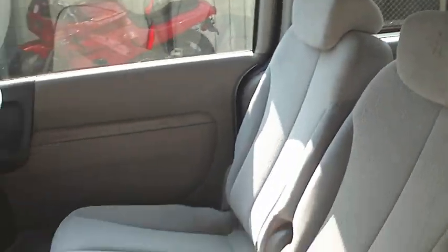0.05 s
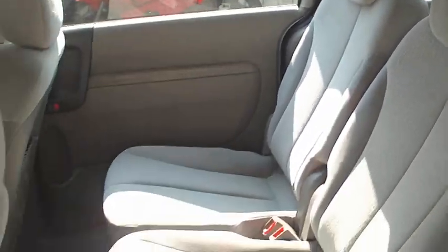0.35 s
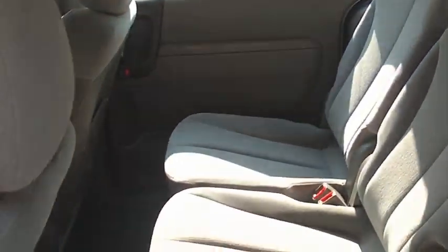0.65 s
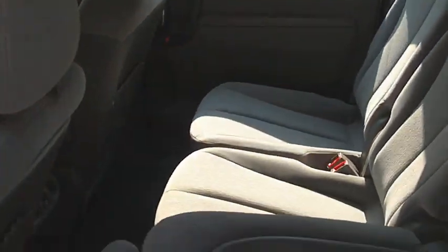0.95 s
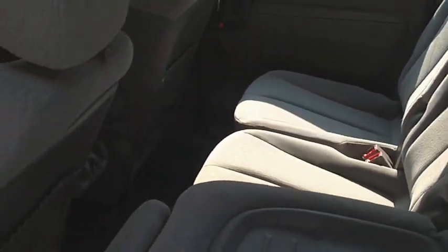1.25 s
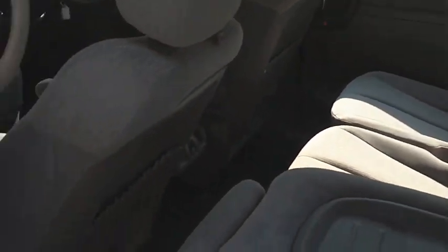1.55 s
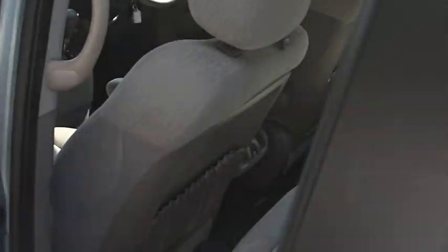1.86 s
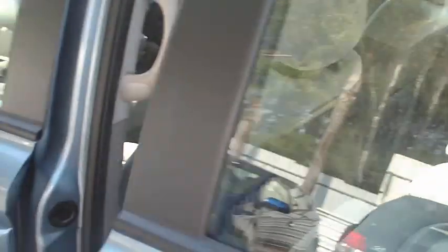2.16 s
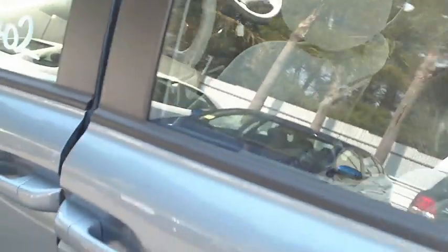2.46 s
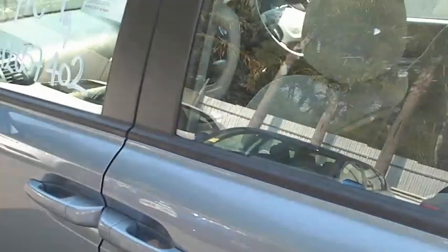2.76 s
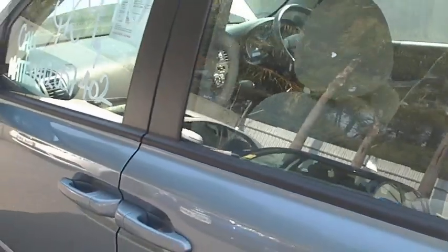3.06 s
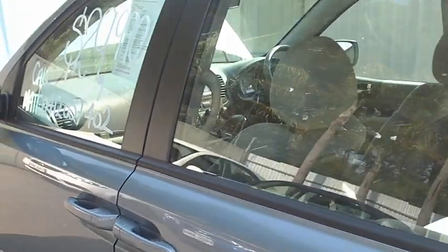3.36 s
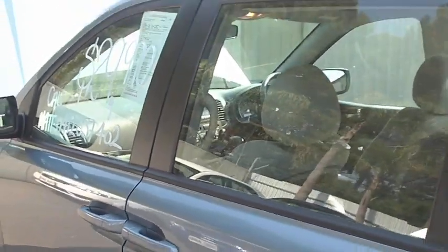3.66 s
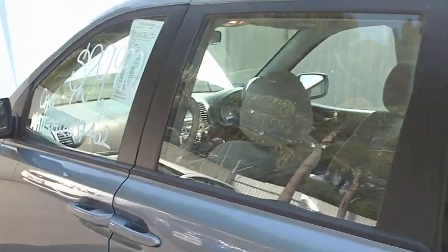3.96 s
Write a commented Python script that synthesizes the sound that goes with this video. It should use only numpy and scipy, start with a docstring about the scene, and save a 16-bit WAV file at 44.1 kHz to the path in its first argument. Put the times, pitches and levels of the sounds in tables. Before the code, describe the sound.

A minivan's sliding door closes nearby, outdoors. After a small click at 0.2 seconds and soft rubbing, its catch clicks free around 1.3 seconds. From 1.5 seconds the door rumbles along its track, knocking at 1.9, then slams shut at about 2.6 seconds with a metallic snap and a low boom. Sleeve-like rustling follows from 3.3 seconds. Steady traffic and low wind continue underneath.

```python
"""A minivan's side door clicks open, rumbles along its track and slams shut, close by and outdoors.
The rollers shake the door panel; the slam rings the latch, sets the body booming and pushes out
a puff of air that overloads the recorder. Soft rubbing, as of sleeve and hand, comes with each move.
Traffic and low wind go on underneath."""
import sys
import numpy as np
from scipy import signal
from scipy.fft import rfft, irfft
from scipy.io import wavfile
from scipy.ndimage import minimum_filter1d

SR = 44100
rng = np.random.default_rng(int(sys.argv[2]) if len(sys.argv) > 2 else 0)


def int16_out(signal):
    """Quantize to a 16-bit WAV file."""
    q = np.round(np.clip(np.atleast_2d(signal).T, -1, 1) * 32767)
    wavfile.write(sys.argv[1], SR, q.astype(np.int16))


N = 176400
T = np.arange(N) / SR

# modes of the door panel: (frequency [Hz], level [dB], t60 [s])
PANEL_MODES = [(55.8, -4.5, .3), (88, -8, .15), (121.5, -2, 0.24), (145, -4, 0.11), (175.7, -3, 0.12),
               (204.4, -1.5, 0.19), (252, -2.5, 0.088), (302.7, -2, 0.09), (345.5, 0, 0.051),
               (488, -4.5, .07), (671, -14.5, 0.059)]
# bright colour of a hardware click: (frequency [Hz], level [dB])
CLICK_SPECTRUM = [(300, -19.5), (1500, 5.5), (2300, -5.5), (2900, 5.5), (3500, -1), (4200, -3), (4900, 1.5),
                  (5800, 2), (6600, -5.5), (7300, -6.5)]


def amp(db):
    """Decibels to gain."""
    return 10 ** (np.asarray(db) / 20)


def unit(x):
    """Scales to rms 1."""
    return x / np.sqrt(np.mean(x ** 2) + 1e-20)


def fader(rows, column=1):
    """Gain over time from one dB column of a curve."""
    rows = np.array(rows)
    return amp(np.interp(T, rows[:, 0], rows[:, column]))


def colour(x, spectrum, ripple_db=0):
    """Gives x a spectrum, with optional ripple on top, at rms 1."""
    hz, db = np.transpose(spectrum)
    f = np.fft.rfftfreq(N, 1 / SR)
    curve_db = np.interp(np.log(f + 1), np.log(hz + 1), db)
    return unit(irfft(rfft(x) * amp(curve_db + ripple_db), N))


def noise(spectrum):
    """Coloured noise at rms 1."""
    return colour(rng.standard_normal(N), spectrum)


def resonate(x, spectrum, width_hz, ripple_db):
    """Colours x like a vibrating object: a smooth spectrum with many small resonances."""
    bins = N // 2 + 1
    lag = np.fft.rfftfreq(bins, SR / N)
    smoothing = np.exp(-(lag * width_hz) ** 2) * (1 - np.exp(-(lag * 10 * width_hz) ** 2))
    ripple = unit(irfft(rfft(rng.standard_normal(bins)) * smoothing, bins))
    return colour(x, spectrum, ripple_db * ripple)


def waver(rate_hz, depth_db):
    """Smooth random gain."""
    f = np.fft.rfftfreq(N, 1 / SR)
    drift = irfft(rfft(rng.standard_normal(N)) * np.exp(-(f / rate_hz) ** 2) * (f > 0), N)
    return amp(depth_db * unit(drift))


def grains(per_s, spread_db):
    """Random tiny impacts of uneven size."""
    size = amp(spread_db * np.minimum(rng.exponential(1, N), 4))
    return unit(size * rng.choice([-1, 1], N) * (rng.random(N) < per_s / SR))


def strike(s, t60, rise_s=.0007):
    """Envelope of a hit at time s: quick rise, exponential decay."""
    t = np.maximum(T - s, 0)
    return (1 - np.exp(-t / rise_s)) * np.exp(-np.minimum(np.log(1000) * t / t60, 40))


def modal_tone(modes, samples):
    """Decaying modes, neighbours swinging in opposite directions."""
    t = np.arange(samples) / SR
    return sum((-1) ** k * amp(db - 60 * t / t60) * np.sin(2 * np.pi * hz * t)
               for k, (hz, db, t60) in enumerate(modes))


def ring(hits, modes):
    """Each hit sets the modes ringing for up to a second."""
    out, tone = np.zeros(N), modal_tone(modes, SR)
    for s, db in hits:
        part = out[round(s * SR):][:len(tone)]
        part += amp(db) * tone[:len(part)]
    return out


def lowpass(x, hz):
    """Steep band limit."""
    return signal.oaconvolve(x, signal.firwin(301, hz, window=("kaiser", 8), fs=SR)[None], "same")


def slam():
    """Metal meets metal, the claw snaps shut, the body booms on and cars and walls echo."""
    # impacts of guide and latch: (time [s], relative crash level [dB], ring level [dB])
    impacts = [(1.9285, -12, -17.5), (2.633, 1.5, 2.5), (2.667, -10, -23), (2.685, -12, -21)]
    # colour of the metal crash: (frequency [Hz], level [dB])
    crash_spectrum = [(150, 12), (700, 0.5), (1800, -3), (2400, -11.5), (3500, -17), (5200, -20),
                      (7200, -25)]
    # ring of the latch: (frequency [Hz], level [dB], t60 [s])
    latch_modes = [(358, -5, .08), (672, -3, 0.14), (918, -4, 0.064), (1017, -1, 0.064), (1285, 1.5, 0.044),
                   (1672, -16, 0.32), (1872, -3, 0.11), (1932, 0.5, 0.097), (2564, -13.5, 0.2),
                   (2710, -15, 0.038)]
    # the claw snaps over its teeth: (time [s], level [dB])
    claw_snaps = [(2.635, -10), (2.64, -10), (2.6508, -7), (2.656, -1), (2.668, -1), (2.684, -9)]
    # boom of the body: (frequency [Hz], level [dB])
    boom_spectrum = [(15, -8.5), (40, -4), (56, 6.5), (85, -4), (118, -1), (150, -15), (230, -12),
                     (330, -19.5), (600, -31.5), (2000, -76)]
    # drone of cabin air and door skin: (frequency [Hz], level [dB], t60 [s])
    cabin_modes = [(55, -4, 1.6), (65.8, -3, 0.46), (114, -16, 0.47)]
    slam_s = 2.65
    crash = noise(crash_spectrum) * sum(amp(db + 3) * strike(s, t60=0.17) for s, db, _ in impacts)
    latch = ring([(s, db) for s, _, db in impacts], latch_modes)
    claw = noise(CLICK_SPECTRUM) * sum(amp(db) * strike(s, t60=0.033) for s, db in claw_snaps)
    boom = noise(boom_spectrum) * amp(-2.5) * strike(slam_s, t60=1.0, rise_s=0.016)
    drone = ring([(slam_s, 0)], cabin_modes)
    echo = noise(crash_spectrum) * amp(-10) * strike(slam_s, t60=0.15, rise_s=0.0064)
    return crash + latch + claw + boom + drone + echo


def rollers():
    """Bumps in the track shake the panel's modes; grit hisses under the wheels."""
    # the door's travel: (time [s], rumble level [dB], hiss level [dB])
    travel = [(1.5, -26, -47.5), (1.62, -19, -40), (1.76, -13, -27), (1.84, -18.5, -29), (1.9, -11, -21),
              (1.98, -13.5, -29.5), (2.07, -12, -22.5), (2.2, -12, -20.5), (2.42, -13.5, -29.5),
              (2.61, -13, -27), (2.67, -4, -52)]
    # hiss of the wheels: (frequency [Hz], level [dB])
    hiss_spectrum = [(150, -9.5), (400, 7.5), (800, 1), (1300, -2), (2300, -6), (2750, -3.5), (3700, -11),
                     (4500, -10), (5500, -18.5), (7200, -51)]
    bumps = grains(per_s=450, spread_db=2.5)
    panel = modal_tone(PANEL_MODES, SR // 2)
    rumble = unit(signal.fftconvolve(bumps, panel)[:N]) * fader(travel, column=1)
    grit = rng.standard_normal(N) + 0.25 * grains(per_s=580, spread_db=7.5)
    hiss = resonate(grit, hiss_spectrum, width_hz=24, ripple_db=2.4)
    hiss *= fader(travel, column=2) * waver(rate_hz=28, depth_db=1)
    return (rumble + hiss) * (T > travel[0][0]) * (T < travel[-1][0])


def judder():
    """The door shudders once, just before the bend in its track."""
    # narrow, low band of the shudder: (frequency [Hz], level [dB])
    spectrum = [(80, -33), (115, -2), (135, -1.5), (165, -7), (210, -22), (500, -68)]
    centre_s, half_length_s = 1.85, 0.079
    return noise(spectrum) * amp(-10.5) * np.exp(-((T - centre_s) / half_length_s) ** 4)


def thuds():
    """Blows knock dully on the panel, and the roller arm thuds into the bend of the track."""
    # blows on the panel: (time [s], level [dB])
    panel_hits = [(1.248, -15.5), (1.357, -11.5), (1.929, -10), (2.6305, -12), (2.686, -6)]
    # blows on the arm: (time [s], level [dB])
    arm_hits = [(1.9315, 1), (2.051, -12)]
    # low ring of the arm: (frequency [Hz], level [dB], t60 [s])
    arm_modes = [(126, -18, 0.13), (181, -0.5, 0.097), (256, -2.5, 0.093), (338, -4, .08)]
    return ring(panel_hits, PANEL_MODES) + ring(arm_hits, arm_modes)


def clicks():
    """Handle, catch and rollers tick in short, bright bursts."""
    # clicks: (time [s], level [dB], t60 [s])
    ticks = [(.178, -13.5, 0.0098), (1.242, -20.5, 0.094), (1.2614, -19, .05), (1.346, -12, 0.053),
             (1.8304, -14.5, 0.055), (1.9055, -13, .06), (1.926, -12.5, .025), (2.2064, -24, 0.035)]
    return noise(CLICK_SPECTRUM) * sum(amp(db) * strike(s, t60) for s, db, t60 in ticks)


def catch():
    """The catch that held the door open is struck and pings."""
    # strikes on the catch: (time [s], level [dB])
    hits = [(1.2635, -23), (1.348, -17)]
    # its high ring: (frequency [Hz], level [dB], t60 [s])
    modes = [(2770, -15, 0.036), (3030, -4, 0.032), (4820, -4.5, 0.047), (5670, -4, .025),
             (6600, 1.5, 0.043), (7000, -9, 0.086)]
    return ring(hits, modes)


def creaks():
    """Handle and trim creak in short bursts of fluttering noise."""
    # creaks: (time [s], level [dB], t60 [s])
    bursts = [(0.1774, -16, 0.02), (0.201, -27, 0.23), (.711, -30.5, 0.19), (1.26, -19.5, 0.058),
              (2.504, -27, .04), (2.724, -22, 0.058)]
    # their thin colour: (frequency [Hz], level [dB])
    spectrum = [(500, -27), (1700, -23), (2300, 1), (3000, -1), (3500, -16.5), (4200, -8.5), (5500, -16),
                (7200, -17)]
    rasp = noise(spectrum) * waver(rate_hz=310, depth_db=4.5)
    return rasp * sum(amp(db) * strike(s, t60) for s, db, t60 in bursts)


def air_puffs():
    """Each puff is a slow pressure swing that dies in a cycle or two."""
    # puffs on the microphone: (time [s], frequency [Hz], level [dB], decay [s])
    puffs = [(1.405, 36.2, -5, 0.0085), (1.58, 30, -5, 0.012), (2.648, 25.6, 8.5, 0.022),
             (3.34, 47.5, -9.5, 0.018)]
    out = np.zeros(N)
    for s, hz, db, decay_s in puffs:
        t = np.maximum(T - s, 0)
        swell = t / decay_s * np.exp(1 - t / decay_s)
        out += amp(db) * np.sin(2 * np.pi * hz * t) * swell
    return out


def rubbing():
    """Strokes of fine friction, as of sleeve and hand, swell, hold and let go."""
    # strokes: (start [s], length [s], level [dB], level change over the length [dB])
    strokes = [(0.945, .2, -18.5, -2.5), (1.168, 0.074, -26.5, 1), (1.537, .27, -18, 0),
               (3.337, 0.19, -13, -8), (3.506, 0.26, -19, -1.5), (3.727, .15, -21.5, 2.5),
               (3.868, 0.14, -22, -5)]
    # colour of the friction: (frequency [Hz], level [dB])
    spectrum = [(60, 0), (170, -9.5), (290, 4.5), (480, -5.5), (750, -4), (1080, -3.5), (1450, -6),
                (1900, -6.5), (2350, -11), (2800, -6), (3200, -8), (3800, -14.5), (4500, -12.5),
                (5400, -17), (6200, -19), (7200, -30)]
    rise_s, release_s = 0.081, 0.072
    power = np.zeros(N)
    for s, length, db, change_db in strokes:
        t = T - s
        shape = np.clip(t / rise_s, 0, 1) * np.exp(-np.maximum(t - length, 0) / release_s)
        power += (shape * amp(db + change_db * np.clip(t / length, 0, 1))) ** 2
    friction = rng.standard_normal(N) + 0.15 * grains(per_s=760, spread_db=7.5)
    rustle = resonate(friction, spectrum, width_hz=17, ripple_db=1.6)
    return rustle * np.sqrt(power) * waver(rate_hz=50, depth_db=0.8)


def traffic():
    """A steady wash of road noise."""
    # colour of the traffic: (frequency [Hz], level [dB])
    spectrum = [(60, -6), (170, 3.5), (300, 4.5), (400, 1), (700, 1.5), (1050, 1.5), (1500, -3.5),
                (2100, -9), (2500, -11), (3100, -14.5), (4300, -19), (6200, -20), (7200, -39.5)]
    # its gentle swell: (time [s], level [dB])
    swell = [(0, -25.5), (.5, -24.5), (.9, -24), (2.6, -22), (2.88, -24), (3.2, -23.5), (4, -23.5)]
    return noise(spectrum) * fader(swell) * waver(rate_hz=11, depth_db=0.37)


def wind():
    """A bed of low, lumpy wind rumble."""
    # colour of the wind: (frequency [Hz], level [dB])
    spectrum = [(10, -10.5), (25, -3.5), (45, -3), (62, 0), (85, -5.5), (125, -11.5), (200, -18.5),
                (500, -47.5)]
    # its rise and fall: (time [s], level [dB])
    gusts = [(0, -21.5), (.9, -17.5), (1.4, -16), (2.5, -14.5), (3.2, -20), (3.45, -14.5), (4, -19)]
    return noise(spectrum) * fader(gusts) * waver(rate_hz=7.2, depth_db=-0.8)


def scene():
    """All sources at the microphone, in mono."""
    background = traffic() + wind() + rubbing()
    door = rollers() + judder() + clicks() + creaks() + catch() + thuds() + slam()
    return (background + door + air_puffs())[None]


def record(dry):
    """Gain control ducks after loud blows; the input overloads, is band-limited and clips."""
    threshold_db, hold_s, recover_db_per_s, share_removed = -9.5, 0.13, 135, 0.84
    ceiling, knee = 1.03, 11
    # the detector ignores the bass and averages power over 30 ms
    sensed = signal.sosfilt(signal.butter(2, 220, "high", fs=SR, output="sos"), dry[0])
    pole = np.exp(-1 / (0.03 * SR))
    power_db = 10 * np.log10(signal.lfilter([1 - pole], [1, -pole], sensed ** 2) + 1e-9)
    excess_db = np.maximum(power_db - threshold_db, 0)
    window = 2 * int(hold_s * SR / 2) + 1
    held_db = -minimum_filter1d(-excess_db, window, origin=window // 2)
    recovery_db = T * recover_db_per_s
    duck_db = share_removed * (np.maximum.accumulate(held_db + recovery_db) - recovery_db)
    ducked = dry * amp(-duck_db)
    saturated = ducked / (1 + np.abs(ducked / ceiling) ** knee) ** (1 / knee)
    clipped = np.clip(lowpass(saturated, hz=7150), -1, 1)
    return lowpass(clipped, hz=16000)


dry = scene()
out = record(dry)
int16_out(out)
```